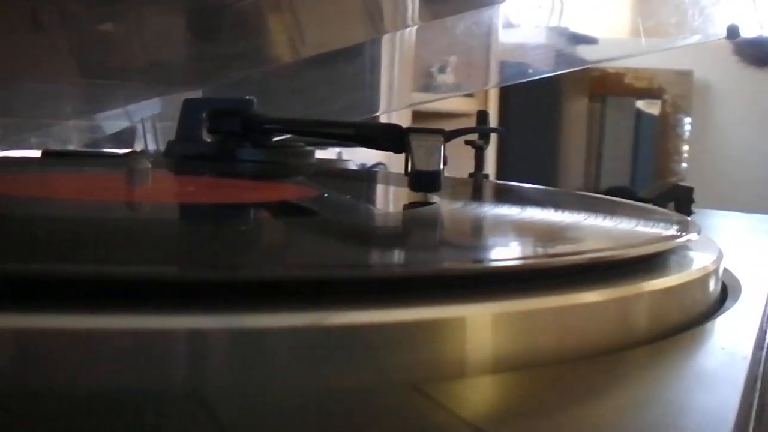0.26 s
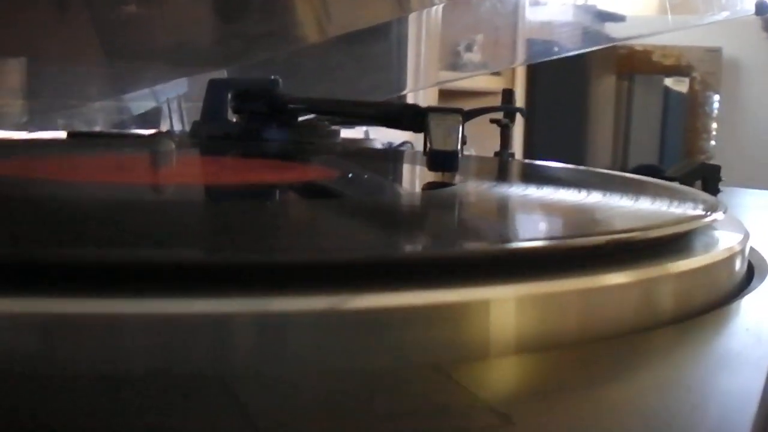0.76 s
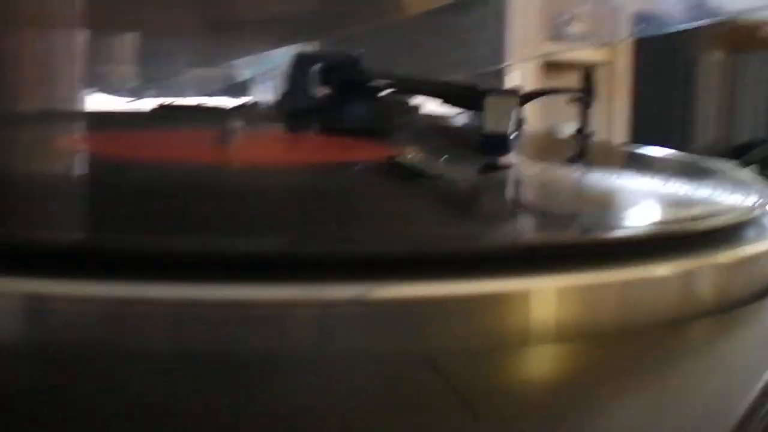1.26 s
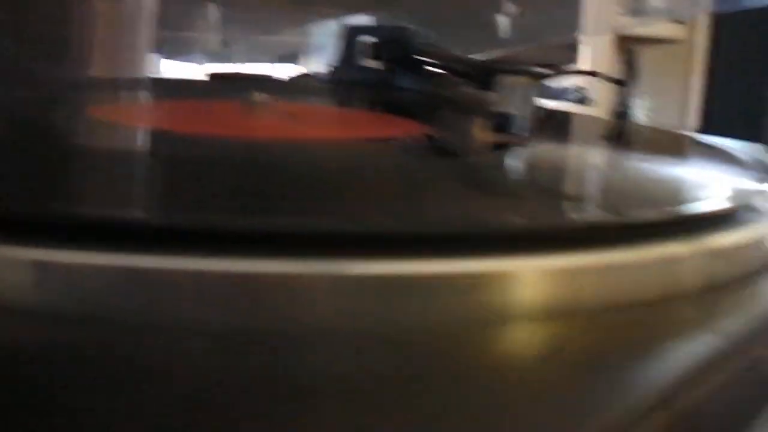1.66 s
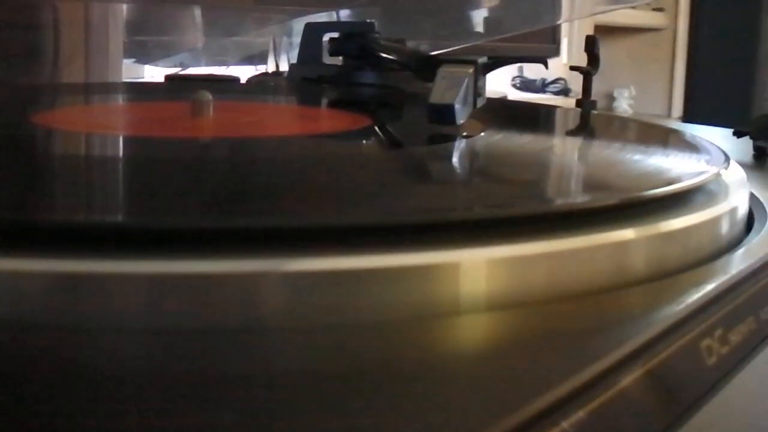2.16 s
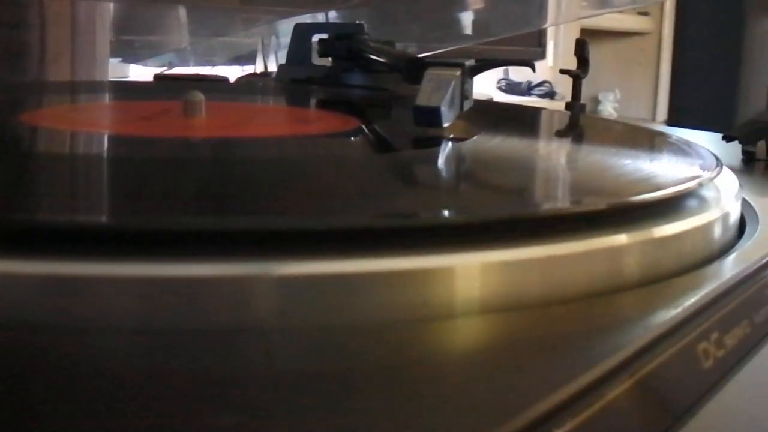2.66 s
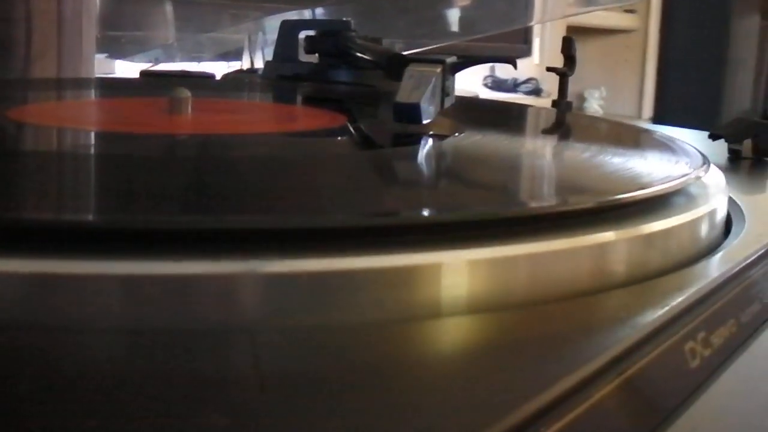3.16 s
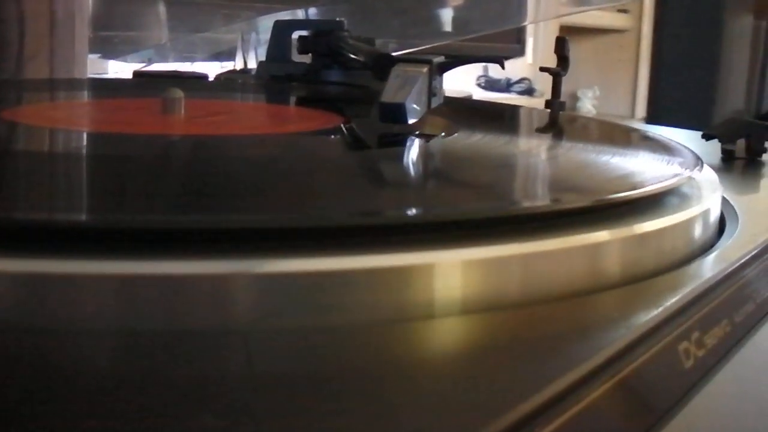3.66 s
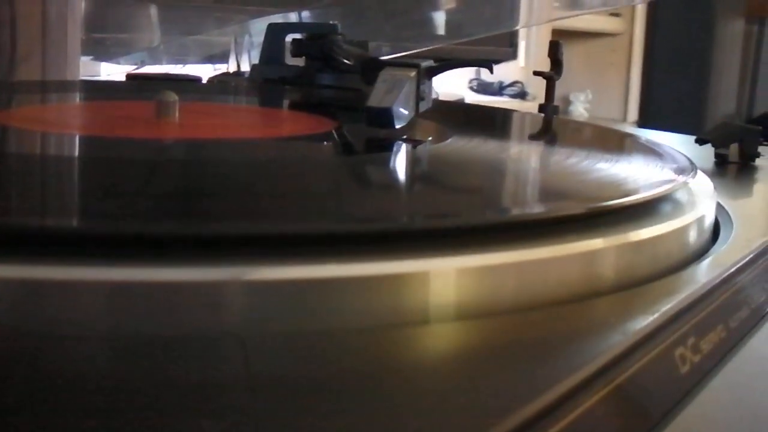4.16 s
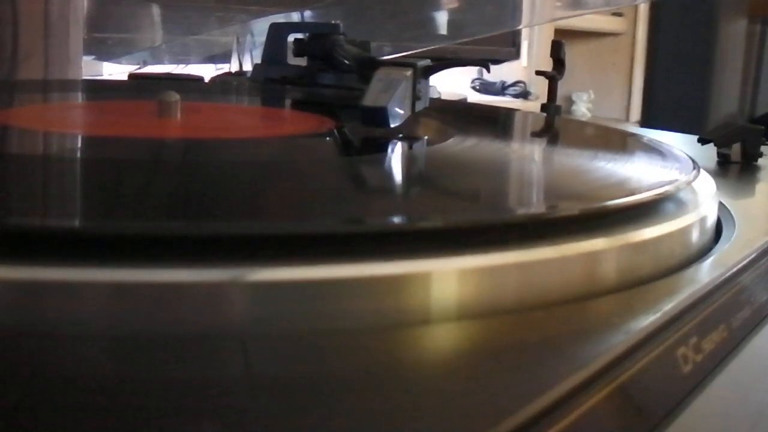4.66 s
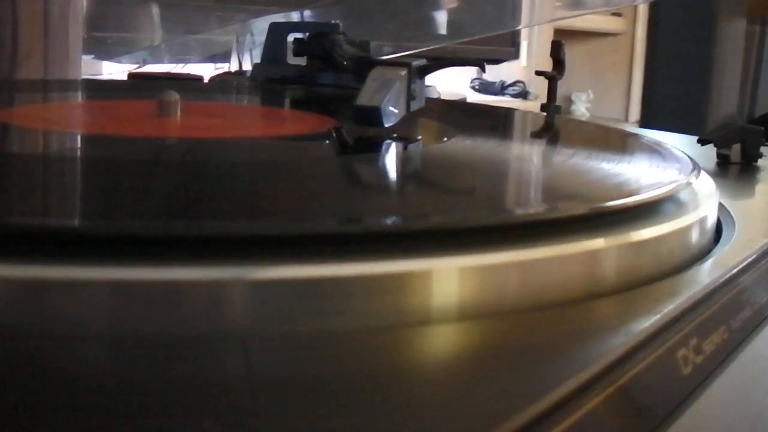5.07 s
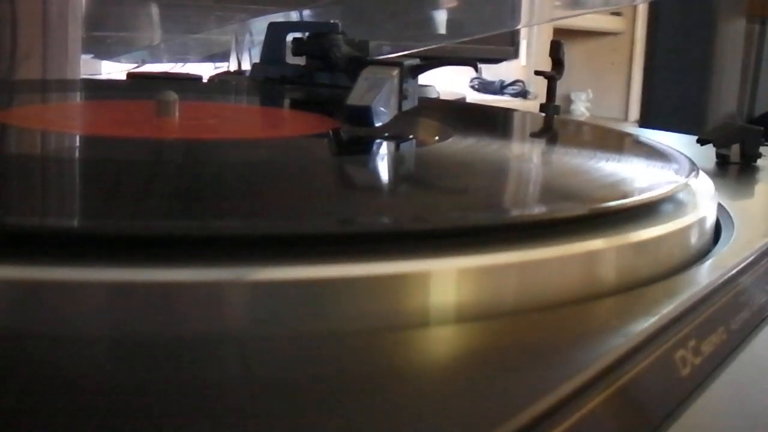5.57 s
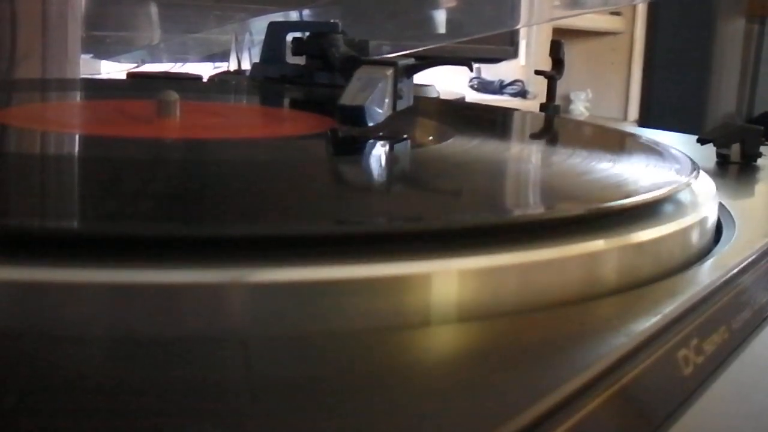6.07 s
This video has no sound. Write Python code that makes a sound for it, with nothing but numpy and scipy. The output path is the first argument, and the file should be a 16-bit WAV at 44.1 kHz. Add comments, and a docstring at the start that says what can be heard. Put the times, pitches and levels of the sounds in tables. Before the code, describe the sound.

Close stereo pickup of a turntable stylus in a silent, worn groove. A short scuffed rush and sharp ticks open, then irregular clicks, crackle and occasional heavy pops follow, each echoed dully by a loudspeaker across the room. Beneath lies a faint, steady motor whirr with rapid fluttering rub, low pulsing hum and soft hiss. No music plays.

```python
"""A brief scuffed rush and a cluster of sharp ticks open, then scattered ticks, thuds and fine crackle.
A stylus rides the silent groove of a worn record, a hand's width from a small stereo camera:
each flaw is a filtered impulse at the stylus, then again, duller, from a loudspeaker across the room.
Under it the drive whirrs in tones and noise locked to the motor, rubbing twice on every turn,
with two low sines that beat and a faint bed of coloured noise for hiss."""
import sys
import numpy as np
from scipy import signal
from scipy.fft import rfft, irfft
from scipy.io import wavfile

SR = 44100
rng = np.random.default_rng(int(sys.argv[2]) if len(sys.argv) > 2 else 0)


def digitize_waveform(pressure):
    """Quantize a signal to 16-bit integers and store it at the path in sys.argv[1].

    Rows of a 2-D input are taken as channels; values are limited to [-1, 1].
    """
    field = np.atleast_2d(pressure).T
    bounded = np.clip(field, -1, 1)
    quanta = np.round(bounded * 32767).astype(np.int16)
    wavfile.write(sys.argv[1], SR, quanta)


N = 278712
TIME = np.arange(N) / SR
MOTOR_HZ = 19.346  # turns per second
BEAT_CREST_S = .208  # both hum lines are in phase here
SPEAKER_DELAY_S, ROOM_T60_S = 0.013, 0.78
TICK_BODY_DB, TICK_DIP_DB = -10, 3.5  # every tick: its low middle, and the dip between crack and sizzle
FULL_SCALE, TOP_HZ = .85, 16600  # ceiling of the rounded peaks, upper edge of the sound

# likeness of left and right in diffuse sound: (f/Hz, correlation)
LIKENESS = [(30, 0.15), (120, 0.47), (500, 0.77), (1100, 0.96), (2200, 0.67), (4000, 0.037), (12000, 0.063)]
# spectrum shape of the steady hiss of groove and room: (f/Hz, relative density/dB)
HISS_SHAPE = [(25, 3), (100, -4), (170, 1), (330, 8), (600, 6.5), (1100, 6), (1600, -4.5), (2300, -4),
              (3000, -4), (5500, -4.5), (7000, -6), (9500, -5), (13300, -11), (15500, -43)]
# the motor's magnetic hum and the mains hum, which beat: (f/Hz, relative level/dB)
HUM_LINES = [(116.07, -69), (120.08, -73.5)]
# whine of the motor: (multiple of the motor turn, level/dB)
WHINE = [(20, -68.5), (25, -61.5), (27, -62), (33, -69), (38, -62.5), (42, -61), (46, -63.5), (49, -59.5),
         (51, -67.5)]
# tones that sing while the drive rubs: (multiple of the motor turn, mean level/dB)
SQUEALS = [(47, -54), (60, -49.5)]
# spectrum shape of the drive's buzz through the plinth: (f/Hz, relative level/dB)
BUZZ_SHAPE = [(100, -40.5), (180, -22), (240, -5), (370, 8.5), (560, -4.5), (740, 0.5), (1000, 5),
              (1250, -1), (1450, 2.5), (2500, -13), (6000, -98)]
# spectrum shape of the rasp, strongest at the firm rub: (f/Hz, relative level/dB)
RASP_SHAPE = [(500, -53), (1400, -13), (1650, -5.5), (1850, -0.5), (2100, -0.5), (2350, -12), (2650, -12),
              (3000, -48), (3300, -7), (3700, -27), (8000, -64)]
# scratches and grit in the groove: (t/s, strength/dB, brightness/dB)
TICKS = [(0.02, 0, 9.5), (0.0445, -7, 4), (0.0511, 5, 0.5), (0.167, -3, 1.5), (0.4098, -9, 10),
         (0.4565, 0, 1.5), (0.8067, -17.5, 7.5), (0.9702, -7.5, 8.5), (1.1004, -2.5, -2), (1.138, -5, 0),
         (1.2186, 8.5, -4), (1.3194, -8, 11), (1.3931, -4.5, 11.5), (1.571, 9, -5.5), (1.6734, 7.5, -5.5),
         (1.694, 1, -2), (1.8407, 11.5, 3.5), (1.9008, -7, 8.5), (2.1602, -8, 3), (2.2476, 2, -11.5),
         (2.287, -17.5, 11.5), (2.4475, -3, 8.5), (2.496, -8.5, 0.5), (2.6364, -12, 9), (2.7944, 0, 0),
         (2.9273, -16.5, 11), (3.12, -5, 8.5), (3.1796, -6.5, -4), (3.573, -2, 10), (3.6694, -6, 7),
         (3.8046, -16.5, 7.5), (3.9879, -21.5, 15), (4.364, -12, 10.5), (4.7603, -15, 9.5),
         (4.8966, 9.5, 5.5), (5.072, -10.5, -1.5), (5.1999, -3, -1), (5.3563, 9, 1.5), (5.8072, -2.5, 3),
         (5.8812, 1, 0), (6.1456, -19, 9)]
# deep pits that jolt the whole arm: (t/s, strength/dB)
POPS = [(0.0511, 1), (0.9194, -2.5), (1.2186, 14), (2.6006, -4.5), (3.4514, 8.5), (3.4616, -2),
        (5.3563, 1.5)]
# dull thud of a pit: (f/Hz, gain/dB)
THUD = [(400, -4.5), (1200, -3), (2300, 0), (3500, -9.5), (8500, -27.5)]
# scuffed patches: (t/s at the centre, half length/s, relative level/dB)
SCUFFS = [(0, 0.073, -33.5), (0.931, 0.023, -32.5), (1.57, 0.032, -45), (2.629, 0.056, -43),
          (3.307, 0.036, -39), (3.478, 0.07, -41), (4.635, 0.023, -46), (4.895, 0.047, -45),
          (5.263, 0.073, -49.5), (5.652, 0.066, -47), (6.043, 0.072, -46.5)]
# resonances of stylus and arm: (f/Hz, gain/dB)
STYLUS = [(60, -26), (300, -13.5), (700, -1), (1300, -4.5), (2300, -1.5), (3000, -6.5), (3900, 0),
          (5200, -1.5), (7000, 4), (9400, 0), (10500, -4.5), (11700, -18), (14000, -24.5), (16500, -47)]
# colour of the ring of platter and lid: (f/Hz, relative gain/dB)
DECK = [(200, 5.5), (900, 5), (1900, 7.5), (3000, 2.5), (6000, -3), (12000, -6.5)]
# loudspeaker and room, shape of the late arrival: (f/Hz, relative gain/dB)
SPEAKER = [(60, -32), (200, 13), (500, 2.5), (1200, 8), (1700, 1.5), (2400, -2), (3000, -7), (4000, -8),
           (9000, -21), (14000, -15)]
# the loudspeaker's boxy knock: (f/Hz, relative level/dB)
CABINET = [(1380, -3), (1690, -5)]


def undb(db):
    """Amplitude ratio of a level in dB."""
    return 10 ** (np.asarray(db) / 20)


def level(x, db):
    """Scale to this RMS level."""
    return x * undb(db) / np.sqrt(np.mean(x ** 2))


def curve(points, size):
    """Points (f/Hz, value) joined on a log axis, at the bins of a transform of this size."""
    hz, value = np.transpose(points)
    bins_hz = np.fft.rfftfreq(size, 1 / SR)
    return np.interp(np.log(bins_hz + 1), np.log(hz), value)


def response(db):
    """The causal, minimum-phase impulse response with this gain."""
    cepstrum = irfft(db * np.log(10) / 20)
    half = len(cepstrum) // 2
    # folding the cepstrum forward in time makes the filter causal
    cepstrum[1:half] *= 2
    cepstrum[half + 1:] = 0
    return irfft(np.exp(rfft(cepstrum)))


def colour(x, points):
    """Filter by a gain curve of (f/Hz, gain/dB) points."""
    return signal.fftconvolve(x, response(curve(points, size=2048)))[:len(x)]


def diffuse(points, size):
    """Coloured noise from all sides: left and right share as much as LIKENESS says in each band."""
    alike = np.clip(curve(LIKENESS, size), -1, 1)
    shares = np.sqrt([(1 + alike) / 2, (1 - alike) / 2])
    mid, side = rfft(rng.standard_normal((2, size))) * shares
    return irfft(np.array([mid + side, mid - side]) * undb(curve(points, size)), size)


def ports(x, lag_s, pan_db):
    """A near source reaches the left port first; pan is left minus right."""
    hz = np.fft.rfftfreq(N, 1 / SR)
    late = irfft(rfft(x) * np.exp(-2j * np.pi * hz * lag_s), N)
    return np.array([x * undb(pan_db / 2), late * undb(-pan_db / 2)])


def hiss():
    """Steady diffuse noise of groove and room, a little stronger on the right."""
    return level(diffuse(HISS_SHAPE, size=N), -50.0) * undb(np.array([[-.7], [.7]]))


def hum():
    """Two close low lines drift in and out of phase, swelling and fading four times a second."""
    lines = sum(undb(db) * np.sqrt(2) * np.sin(2 * np.pi * hz * (TIME - BEAT_CREST_S))
                for hz, db in HUM_LINES)
    return ports(lines * undb(1.0), lag_s=0.00049, pan_db=-2.5)


def motor_tones(turn, table):
    """Sines locked to whole multiples of the motor turn, each at a random phase."""
    return sum(undb(db) * np.sqrt(2) * np.sin(2 * np.pi * (round(order) * turn + rng.random()))
               for order, db in table)


def rubbing(turn, width, weak_db):
    """Contact pressure over a motor turn: one firm rub and a lighter one nearly opposite."""
    firm, light = (np.exp(-.5 * (((turn - at + .5) % 1 - .5) / width) ** 2) for at in (.525, .98))
    return level(firm + undb(weak_db) * light + 0.013, 0)


def each_turn(turn, pressure):
    """The same grain passes on every turn, so its noise falls into lines of equal strength."""
    one_turn = np.arange(round(SR / MOTOR_HZ)) * MOTOR_HZ / SR
    lines = rfft(rng.standard_normal(len(one_turn)) * pressure(one_turn))
    grain = irfft(lines / np.abs(lines), len(one_turn))
    return np.interp(turn, one_turn, grain, period=1)


def drive():
    """The motor whines over a buzz; each rub squeals, led by a rasp that is strongest at the firm one."""
    turn = MOTOR_HZ * TIME
    wobble = level(colour(rng.standard_normal(N), [(10, -9), (40, -43), (200, -96)]), -19.5)
    whine = motor_tones(turn, WHINE)
    squeals = motor_tones(turn, SQUEALS) * rubbing(turn, width=0.076, weak_db=-5.0)
    buzz_grain = each_turn(turn, lambda at: 0.66 + rubbing(at, width=0.13, weak_db=-6))
    buzz = level(colour(buzz_grain, BUZZ_SHAPE), -60.0)
    # the rasp comes 0.12 of a turn ahead of the squeal
    rasp_grain = each_turn(turn, lambda at: rubbing(at + 0.12, width=0.086, weak_db=-11.5))
    rasp = level(colour(rasp_grain, RASP_SHAPE), -55.5)
    return ports((whine + squeals) * (1 + wobble) + buzz + rasp, lag_s=.00008, pan_db=-0.8)


def loudspeaker(early_db, early_s, db):
    """Response from across the room: a brighter cluster of first reflections, then the long tail."""
    age = np.maximum(TIME[:SR] - SPEAKER_DELAY_S, 0)
    fade = 1000 ** (-age / ROOM_T60_S) * (1 - np.exp(-age / 0.001))
    cluster = undb(early_db) * age / early_s * np.exp(1 - age / early_s)
    first = diffuse(SPEAKER, size=SR) * cluster
    first = np.array([colour(port, [(700, -5.5), (2300, -4), (3500, 1.5)]) for port in first])
    tail = diffuse(SPEAKER, size=SR) * fade
    return undb(db) * (tail + first) / np.sqrt(np.sum(fade ** 2))


def knock(db, rise_s):
    """Response of the cabinet, whose resonances swell and die within some ten milliseconds."""
    age = np.maximum(TIME[:SR // 10] - SPEAKER_DELAY_S, 0)
    swell = (age / rise_s) ** 2 * np.exp(-age / rise_s)
    modes = sum(undb(mode_db) * np.sin(2 * np.pi * hz * age) for hz, mode_db in CABINET)
    return undb(db) * swell * modes


def deck_ring(t60_s, db):
    """Response of platter and lid, which scatter each tick for a few milliseconds."""
    t = TIME[:SR // 20]
    ring = np.array([colour(rng.standard_normal(len(t)), DECK) for _ in range(2)])
    fade = 1000 ** (-t / t60_s) * (1 - np.exp(-t / 0.0015))
    return undb(db) * ring * fade / np.sqrt(np.sum(fade ** 2))


def dust(per_s, db, spread_db):
    """Fine specks strike at random, a thin crackle of tiny ticks in uneven sizes."""
    size = undb(db + spread_db * np.minimum(rng.standard_exponential(N), 3))
    specks = (rng.random(N) < per_s / SR) * size * rng.choice([-1, 1], N)
    return colour(specks, [(1200, -1), (3500, -13), (8500, 11.5)])


def scuffs(grains_per_s):
    """A scuffed patch is a short rush of dense, bright grains."""
    swell = sum(undb(db) * np.exp(-2 * ((TIME - s) / length) ** 2) for s, length, db in SCUFFS)
    grains = (rng.random(N) < grains_per_s / SR) * rng.standard_normal(N)
    grains = colour(grains, [(500, 7.5), (1500, 2.5), (4000, 9.0), (6500, 4.0), (10000, -2.5)])
    return swell * level(grains, -0.61)


def tick_spectrum(bright_db):
    """A narrow flaw: thin body, a crack near 3 kHz, a dip, then a sizzle set by its brightness."""
    return [(1200, TICK_BODY_DB), (2600, -1.44), (3500, 0.59),
            (5500, .5 * bright_db - TICK_DIP_DB), (8500, bright_db)]


def clicks():
    """Each flaw kicks the stylus once, as one impulse: narrow ones tick, deep ones thud."""
    ticks = [(s, db, tick_spectrum(bright_db)) for s, db, bright_db in TICKS]
    pops = [(s, db, THUD) for s, db in POPS]
    out = np.zeros(N + SR)
    for s, db, spectrum in ticks + pops:
        kick = undb(db) * response(curve(spectrum, size=512))
        start = int(s * SR)
        out[start:start + len(kick)] += kick
    return out[:N]


def groove():
    """Stylus motion, heard directly, off the deck and through the loudspeaker."""
    crackle = dust(per_s=15, db=-32, spread_db=3.9)
    motion = colour(clicks() + crackle + scuffs(grains_per_s=1700), STYLUS)
    left, right = ports(motion, lag_s=.000085, pan_db=-1)
    # the left port leans towards 2.3 kHz, with less on either side
    left = colour(left, [(1000, -8.0), (2300, 6.0), (5000, -8.5), (9000, -2.0)])
    direct = np.array([left, right])
    scatter = signal.fftconvolve(motion[None], deck_ring(t60_s=0.021, db=-6.0))[:, :N]
    far = loudspeaker(early_db=2.5, early_s=0.0061, db=-1)
    room = signal.fftconvolve(motion[None], far)[:, :N]
    boxy = signal.fftconvolve(motion, knock(db=-25.5, rise_s=0.002))[:N]
    cabinet = ports(boxy, lag_s=.00005, pan_db=-3.5)
    return direct + scatter + room + cabinet


def scene():
    """Hiss, hum and drive lie under the groove noise."""
    return hiss() + hum() + drive() + groove()


def record(dry):
    """The camera has a narrow notch in the treble, rounds the tallest peaks and cuts the top."""
    # a share of the unfiltered sound keeps the notch from being total
    notched = .2 * dry + .8 * signal.lfilter(*signal.iirnotch(7900, 18, fs=SR), dry)
    rounded = notched / (1 + (notched / FULL_SCALE) ** 6) ** (1 / 6)
    return signal.sosfiltfilt(signal.ellip(8, .1, 50, TOP_HZ, fs=SR, output="sos"), rounded)


dry = scene()
out = record(dry)
digitize_waveform(out)
```